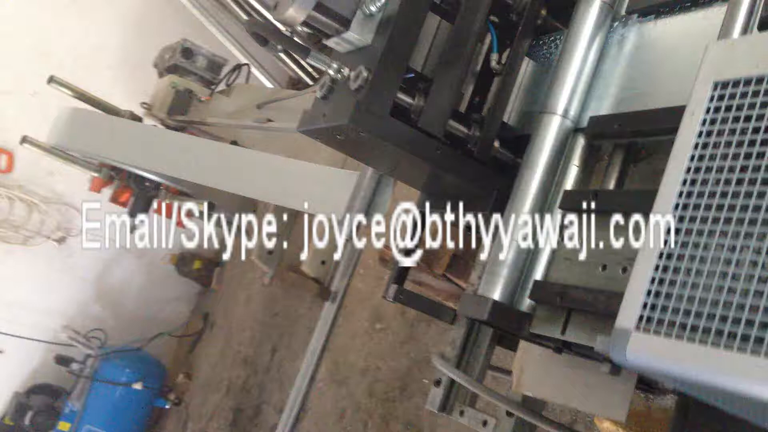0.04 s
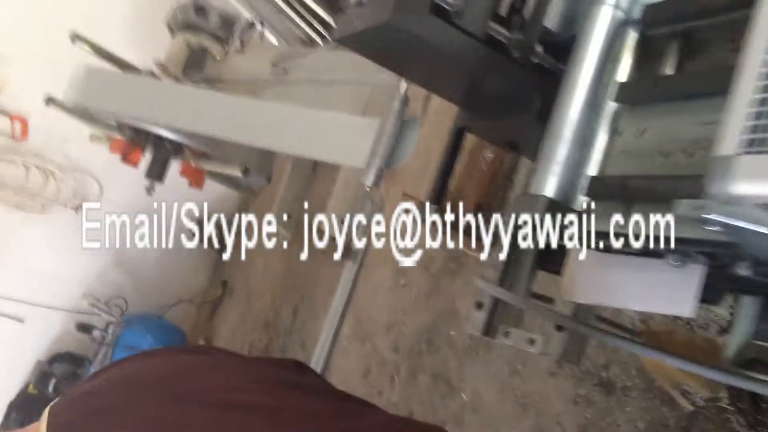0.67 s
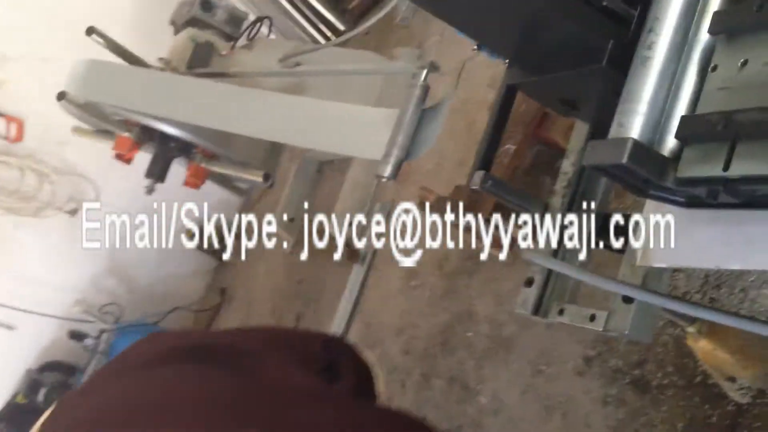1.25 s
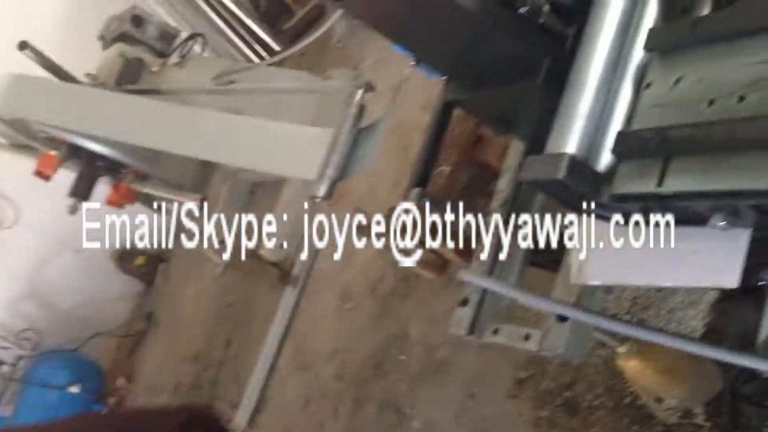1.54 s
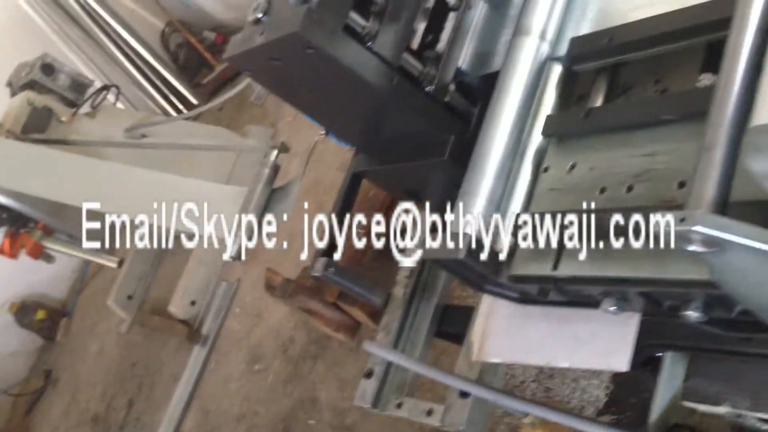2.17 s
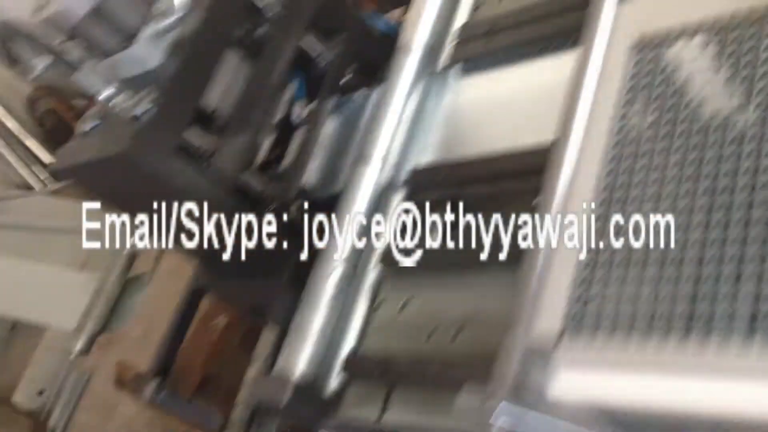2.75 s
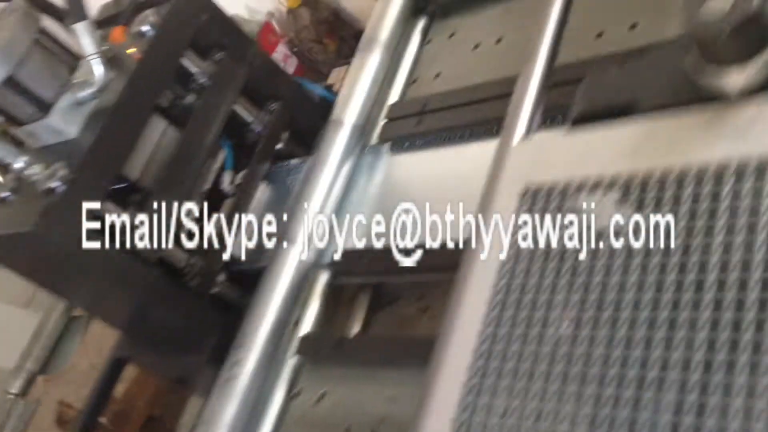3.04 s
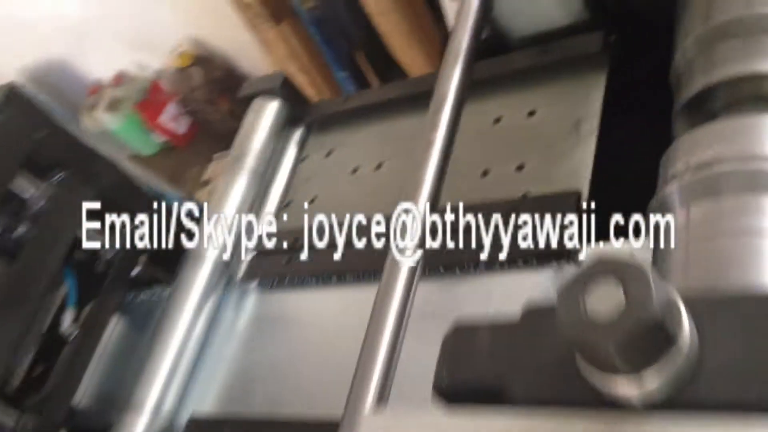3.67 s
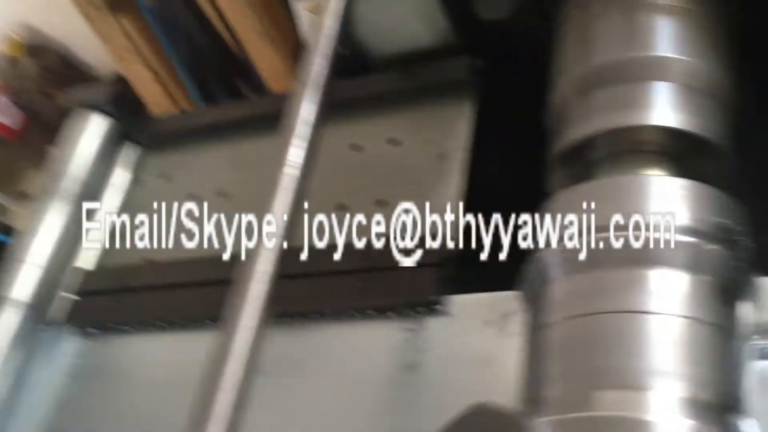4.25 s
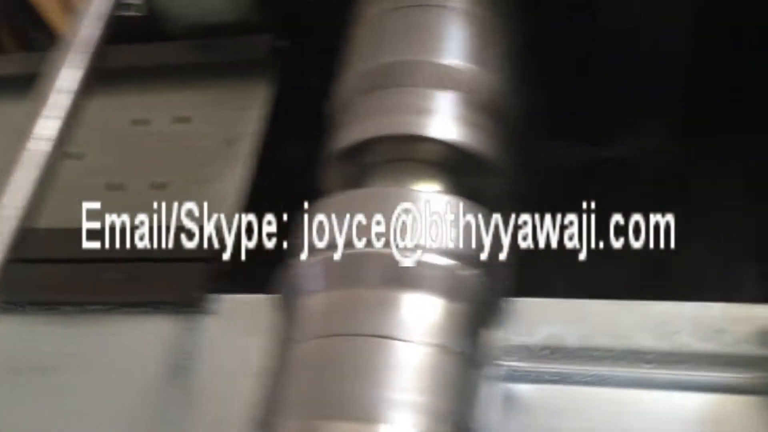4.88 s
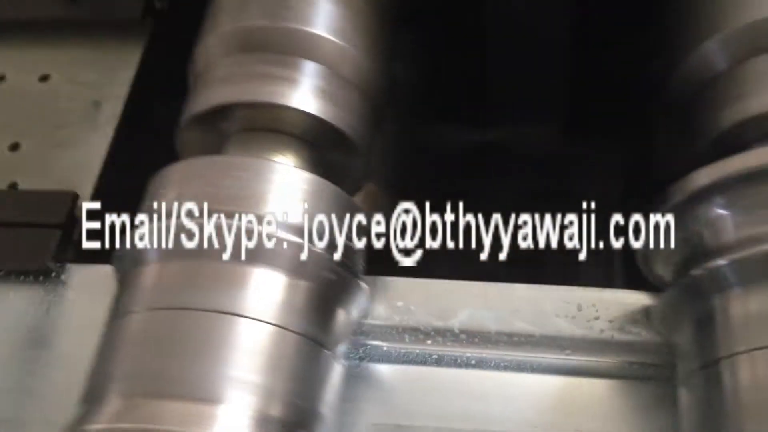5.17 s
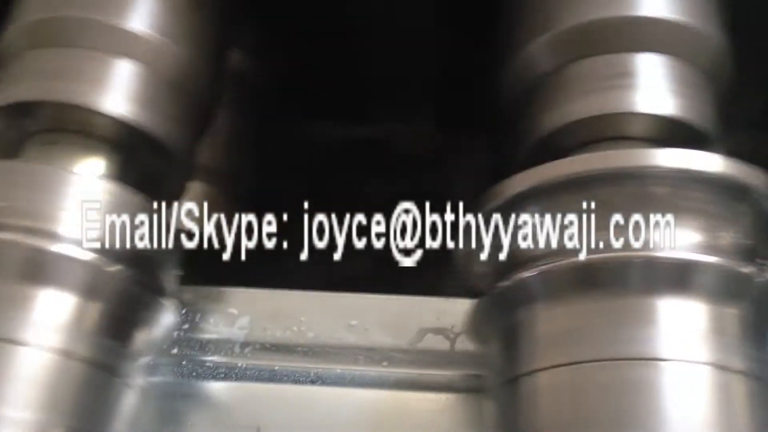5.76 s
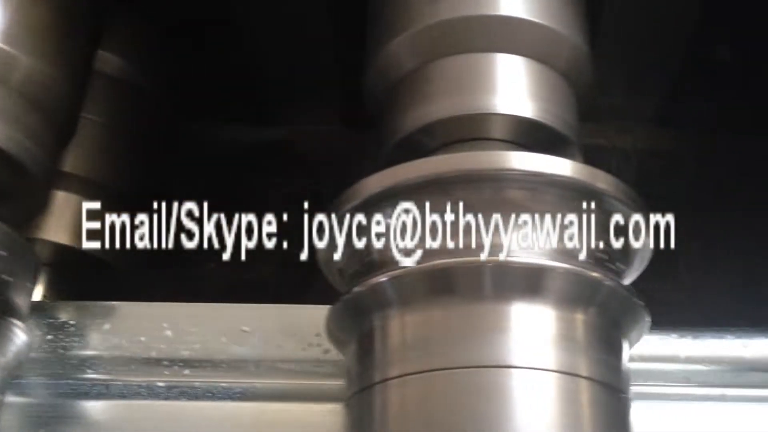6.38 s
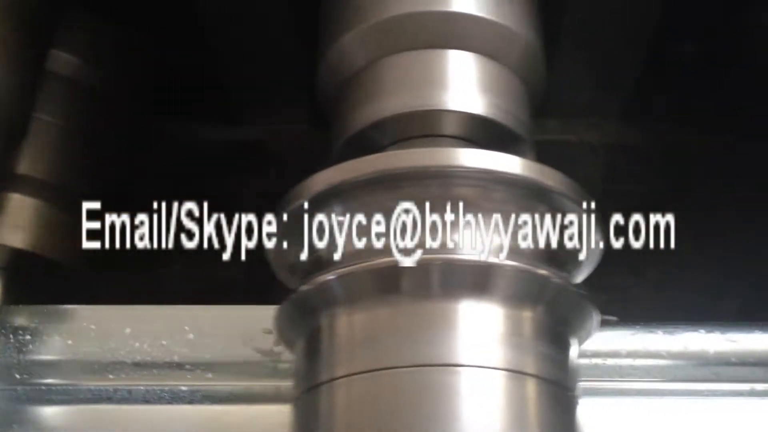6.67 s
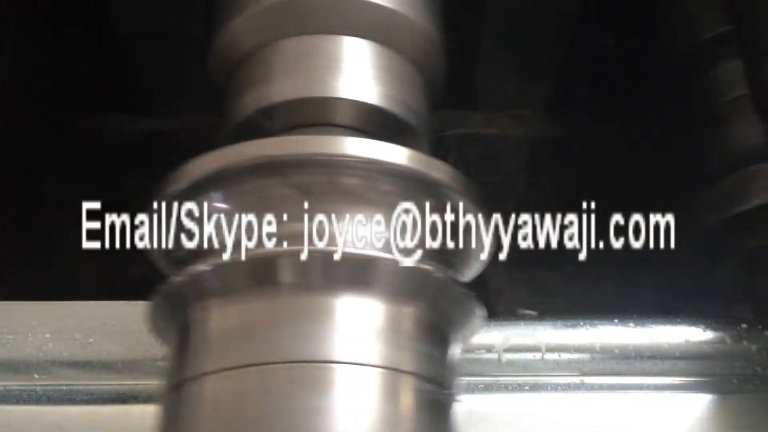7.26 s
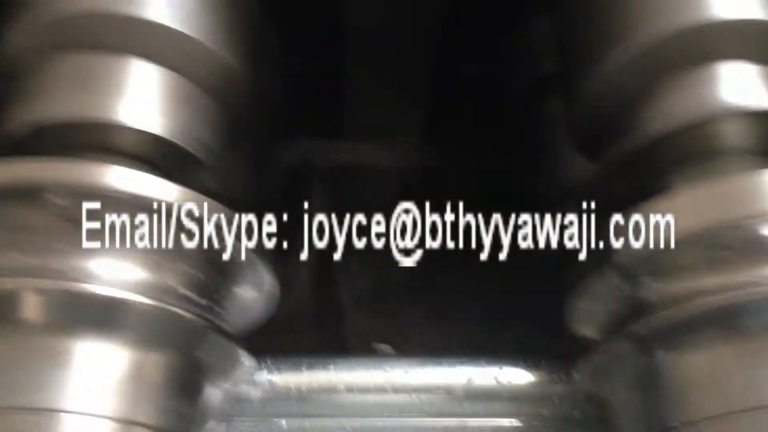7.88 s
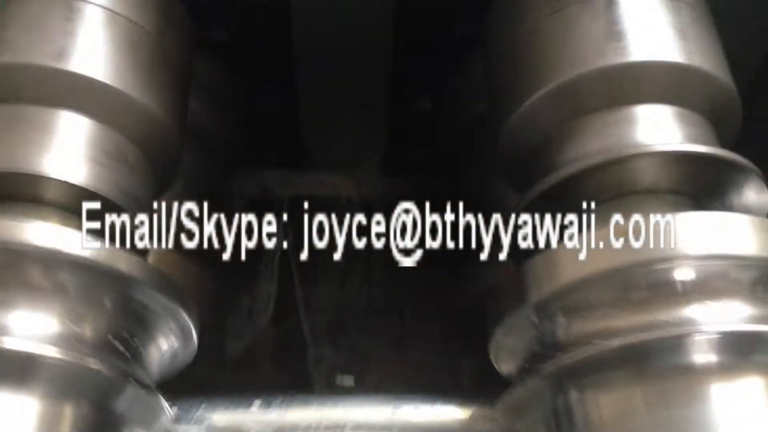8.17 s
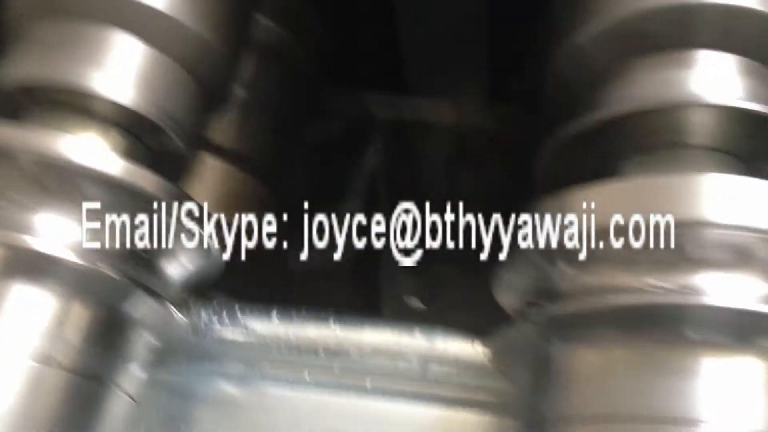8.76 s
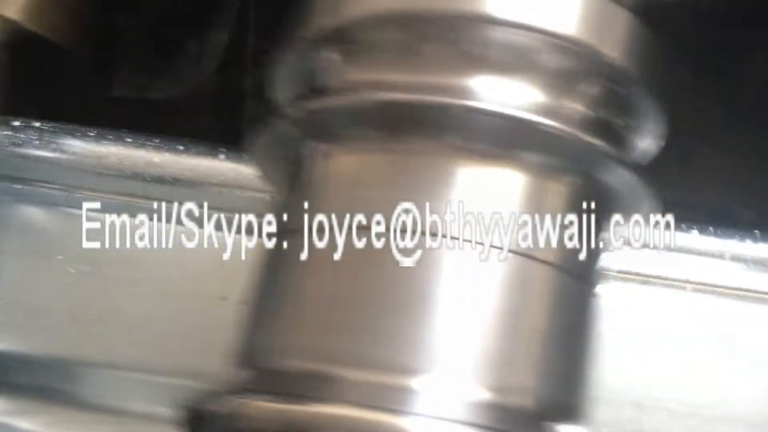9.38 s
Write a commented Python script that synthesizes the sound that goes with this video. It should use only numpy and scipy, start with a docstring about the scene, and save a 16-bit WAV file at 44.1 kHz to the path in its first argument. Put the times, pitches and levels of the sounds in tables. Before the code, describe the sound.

Loud rasping, ringing grinding on steel gives way to a free-spinning grinder's whine and a sheet metal machine's steady hum.

```python
"""Angle grinder beside a roll former

An angle grinder spins up, skims and digs into steel for three seconds, bogs down, lifts off and runs free.
Behind it a machine shapes sheet metal: its pump hums, its drive starts with a thud and drones on,
and the moving sheet ticks and clanks in the rollers. One microphone walks towards the rollers;
its gain control turns the loud grinding down and slowly recovers."""
import sys
import numpy as np
from scipy import signal
from scipy.fft import rfft, irfft, next_fast_len
from scipy.io import wavfile
from scipy.ndimage import uniform_filter1d, minimum_filter1d, map_coordinates

SR = 44100
rng = np.random.default_rng(int(sys.argv[2]) if len(sys.argv) > 2 else 0)


def store_pcm(level_fs):
    """Save levels as 16-bit WAV."""
    pcm = np.round(np.clip(level_fs, -1, 1) * 32767).astype(np.int16)
    wavfile.write(sys.argv[1], SR, np.atleast_2d(pcm).T)


N = 415863
TIME = np.arange(N) / SR
MIC_ON_S = 0.1428


# the disc pressing steadily on the steel (time [s], rasp level [dB], fizz level [dB])
STEADY_CONTACT = [(1.17, -16.5, -14.5), (1.55, -11, -16.5), (1.9, -13, -17), (2.3, -9.5, -11.5),
                  (3.6, -9, -12.5), (3.82, -8.5, -13.5), (4.06, -8, -15.5)]
# the disc skimming the edge in a bright spray (start [s], end [s], rasp level [dB], fizz level [dB])
EDGE_SKIMS = [(1.14, 1.195, -26, -21), (1.245, 1.37, -18, -10.5), (1.375, 1.48, -13, -9.5),
              (1.605, 1.73, -22, -10), (1.985, 2.03, -16, -11), (2.91, 2.99, -11, -19),
              (3.48, 3.64, -12, -14.5)]
# the tone colours of the harsh rasp and the high fizz (frequency [Hz], relative level [dB])
RASP_COLOUR = [(1530, -24), (2600, -4.5), (2820, -4), (3720, 1), (4220, -3.5), (4930, 1), (5600, -7),
               (6150, -4), (8000, -14.5), (10400, -15.5), (17600, -120)]
FIZZ_COLOUR = [(4410, -5.5), (7500, -4.5), (8800, -9), (10900, -6.5), (12800, -9), (15200, -13)]

def grinding(mesh_hz, touch_s=1.153, lift_s=4.101, turns_per_tooth=0.021):
    """The disc's grit tears at the steel, hardest once a turn; skims make it brighter."""
    rasp_db, fizz_db = curves(STEADY_CONTACT)
    steady_rasp = amp(rasp_db) * fading(lift_s, t60=0.67)
    steady_fizz = amp(fizz_db) * fading(lift_s, t60=0.45)
    skim_rasp, skim_fizz = strokes(EDGE_SKIMS, attack_s=0.029, t60=0.42)
    turn = np.sin(2 * np.pi * np.cumsum(mesh_hz * turns_per_tooth) / SR)
    contact = amp(-0.5 * turn + 0.4 * wobble(70) + 1.5 * wobble(2500))  # the fast wobble is the grit
    grit = lambda: unit(contact * noise(patchy_db=2.5))
    steel = ringing_steel(grit, steady_rasp, mesh_hz)
    walls = lambda x: workshop(x, t60=0.45, wet_db=-3.5)
    rasp = np.hypot(steady_rasp, skim_rasp) * walls(coloured(grit(), RASP_COLOUR))  # hypot adds powers
    fizz = np.hypot(steady_fizz, skim_fizz) * walls(coloured(grit(), FIZZ_COLOUR))
    return (steel + rasp + fizz) * ramp(touch_s, 0.009)


# the disc digging in (start [s], end [s], ring level [dB], growl level [dB])
DEEP_DIGS = [(1.26, 1.34, -18, -32), (1.74, 1.83, -14, -43), (1.9, 2.05, -12, -46),
             (2.15, 2.29, -14.5, -35), (2.79, 2.92, -20, -22.5), (3.07, 3.22, -13, -22),
             (3.255, 3.43, -13.5, -24.5), (3.6, 3.72, -7.5, -23.5), (3.86, 4.0, -6.5, -40),
             (4.03, 4.165, -11, -26)]
# the notes the steel rings at (frequency [Hz], width [Hz], relative level [dB])
STEEL_NOTES = [(1236, 54, -10.5), (1410, 3.4, 3.5), (1580, 3.7, 8), (1675, 8, 4), (1776, 23, 2),
               (1855, 19, 4), (1960, 76, 1), (2129, 16.5, 4.5), (2260, 37, -2), (2400, 15, -4.5)]
# the tone colour of the steel's growl (frequency [Hz], relative level [dB])
GROWL_COLOUR = [(480, -28), (650, 0.5), (850, 3), (1050, 3), (1260, 6.5), (1500, -4)]

def ringing_steel(grit, steady_rasp, mesh_hz, ring_db=-6, growl_db=-21):
    """The steel rings and growls under the disc, and louder at each dig."""
    dig_ring, dig_growl = strokes(DEEP_DIGS, attack_s=0.034, t60=0.67)
    best_band = [(1400, 0), (2450, 0)]  # the plate gives off sound best between these frequencies
    notes = coloured(resonant(grit(), STEEL_NOTES), best_band)
    scrape = amp(-7) * coloured(grit(), best_band)  # fills in between the notes
    ring = np.hypot(amp(ring_db) * steady_rasp, dig_ring) * unit(notes + scrape)
    sputter = chatter(mesh_hz)
    growl_gain = np.hypot(amp(growl_db) * steady_rasp, dig_growl)
    growl = growl_gain * workshop(coloured(grit(), GROWL_COLOUR), t60=0.46, wet_db=2.0)
    return ring + sputter + growl


def chatter(mesh_hz, start_s=2.17, end_s=2.84):
    """The straining gears shake the disc against the steel, so it sputters."""
    gain = amp(-12.5) * ramp(start_s, 0.1) * fading(end_s, t60=0.45)
    return gain * tone(mesh_hz, rough=0.95, width_hz=170)


# single notes of the steel that the disc catches (start [s], end [s], frequency [Hz], level [dB])
CAUGHT_NOTES = [(1.25, 1.7, 6140, -25), (1.25, 1.6, 7000, -26), (1.295, 1.578, 2220, -20),
                (1.738, 1.827, 1770, -26), (1.932, 2.07, 1674, -13), (1.955, 2.415, 5990, -17),
                (2.462, 2.535, 2262, -9), (2.933, 3.038, 4950, -18), (3.495, 3.591, 4970, -18),
                (3.622, 3.68, 5900, -18.5), (3.98, 4.1, 4430, -10.5), (4.023, 4.1, 4350, -26)]

def squeals():
    """A caught note builds up, wavers while the disc drives it, and rings out cleanly."""
    out = np.zeros(N)
    for start, end, hz, db in CAUGHT_NOTES:
        wavering = tone(hz, rough=0.55 * fading(end, t60=0.3), width_hz=50)
        out += amp(db) * ramp(start, 0.029) * fading(end, t60=0.73) * wavering
    return out


FREE_HZ = 6245  # how often the gear teeth meet (mesh) at full, free speed
# the grinder's speed while it strains in the cut (time [s], gear mesh rate [Hz])
STRAINING_SPEED = [(2.15, 1880), (2.24, 1896), (2.3, 2220), (2.52, 2280), (2.62, 2124), (2.78, 2293)]

def grinder_speed(opening_hz=3050, bog_s=1.3, freed_s=4.265, lag_s=0.485):
    """The gear mesh rate in Hz: it runs up, bogs down in the cut, and runs up again once freed."""
    run_up = lambda start, hz: FREE_HZ + (hz - FREE_HZ) * np.exp(-np.maximum(TIME - start, 0) / lag_s)
    straining_hz, = curves(STRAINING_SPEED)
    bogged = ramp(bog_s, 0.4)
    return (1 - bogged) * run_up(MIC_ON_S, opening_hz) + bogged * run_up(freed_s, straining_hz)


# the grinder's fan along the walk (time [s], rush level [dB], hiss level at free speed [dB])
FAN_LEVELS = [(1.1, -30.5, -31.5), (4.4, -28, -29.5), (5.8, -28.5, -30), (7.0, -27.5, -32),
              (9.2, -27.5, -33)]
# the tone colours of the fan's rush and hiss (frequency [Hz], relative level [dB])
RUSH_COLOUR = [(530, -44), (900, -3.5), (977, -6), (1590, -8.5), (1720, -1.5), (2130, -3), (2290, 2),
               (2580, -2.5), (2950, -0.5), (3580, -5.5), (6080, -9), (8000, -26.5), (10400, -48),
               (17600, -120)]
HISS_COLOUR = [(3500, -8), (5000, -7), (6200, -12.5), (7900, -13), (9500, -16.5), (11800, -19.5),
               (15400, -25.5)]

def grinder_motor(mesh_hz, housing_hz=3900, housing_width_hz=1050, whistle_ratio=2.595):
    """The fan blows, the gears whine most where the housing rings, and the motor's rotor whistles."""
    rush_db, hiss_db = curves(FAN_LEVELS)
    rush = amp(rush_db) * workshop(coloured(noise(patchy_db=2.0), RUSH_COLOUR), t60=0.16, wet_db=-7.0)
    hiss = amp(hiss_db) * (mesh_hz / FREE_HZ) ** 2.3 * coloured(noise(patchy_db=1.0), HISS_COLOUR)
    housing_gain = np.exp(-((mesh_hz - housing_hz) / housing_width_hz) ** 2)
    breathy_tone = tone(mesh_hz, rough=0.5, width_hz=380)
    whine = amp(rush_db - 13.5) * workshop(housing_gain * breathy_tone, t60=1.0, wet_db=-1)
    fast = np.clip((mesh_hz - 3800) / 2000, 0, 1)  # two thin tones come in at high speed
    gear_tone = amp(-46) * fast ** 2 * tone(mesh_hz, rough=0.55, width_hz=27)
    whistle = amp(-48) * np.sqrt(fast) * tone(mesh_hz * whistle_ratio, rough=0.81, width_hz=320)
    return rush + hiss + whine + gear_tone + whistle


# the pump's tones (frequency [Hz], base level [dB])
PUMP_TONES = [(581.4, -38), (651.4, -36.5), (775.2, -37.5), (872.1, -46), (1157, -45), (1459, -38),
              (2611, -42)]
# how the pump's load shifts them all (time [s], level change [dB])
PUMP_LOADING = [(0.58, -3.5), (0.8, -16), (9.43, -11.5)]

def pump():
    """The hydraulic pump hums on several steady pitches."""
    load_db, = curves(PUMP_LOADING)
    return amp(load_db) * sum(amp(db) * tone(hz, rough=0.083, width_hz=15) for hz, db in PUMP_TONES)


# the drive swelling and fading along the walk (time [s], hum level [dB], gearbox level [dB])
DRIVE_LEVELS = [(0.9, -30.5, -33.5), (1.28, -31, -34.5), (1.42, -36, -37.5), (2.2, -30, -37.5),
                (3.4, -28.5, -32), (4.05, -33, -34), (4.9, -29.5, -29), (5.8, -34, -30), (6.5, -31, -29),
                (7.5, -36, -30.5), (8.25, -35.5, -33.5), (8.75, -35, -30), (9.4, -45, -33)]
# the gearbox's tones (frequency [Hz], relative level [dB])
GEARBOX_TONES = [(434, -8), (598, -14), (651, -7), (748, -1.5), (768, -8)]

def drive(start_s=0.64, hum_hz=298.8):
    """The roll former's motor hums while its gear tones beat against each other."""
    hum_db, gears_db = curves(DRIVE_LEVELS)
    hum = amp(hum_db) * tone(hum_hz, rough=0.0055, width_hz=9.9)
    gears = amp(gears_db) * sum(amp(db) * tone(hz, rough=0.24, width_hz=28) for hz, db in GEARBOX_TONES)
    return (hum + gears) * ramp(start_s, 0.067)


# the tone colours of the low rumble and the rolling noise (frequency [Hz], relative level [dB])
RUMBLE_COLOUR = [(25, -34), (50, -26), (90, -20.5), (120, -8.5), (160, -3.5), (200, 4), (240, -4.5),
                 (290, -4)]
ROLLING_COLOUR = [(150, -52), (250, -7), (400, 1), (520, -1), (610, 0.5), (700, 0.5), (780, 0.5), (860, 0),
                  (1100, -6.5), (1600, -6.5)]

def rollers(approach_db_per_s=0.896):
    """The turning rollers rumble, louder as the microphone comes nearer."""
    near_db = approach_db_per_s * TIME
    rumble = amp(-44 + near_db) * coloured(noise(patchy_db=1.4), RUMBLE_COLOUR)
    flutter = noise(patchy_db=2.5) * amp(1.54 * wobble(60))
    rolling = amp(-36 + near_db) * workshop(coloured(flutter, ROLLING_COLOUR), t60=0.67, wet_db=0.5)
    return rumble + rolling


# blows in the machine's frame (time [s], level [dB], rise time [s], fade time [s])
FRAME_BLOWS = [(0.614, -22, 0.024, 0.62), (0.675, -27.5, 0.0088, 0.45)]
# the frame's dull tone colour (frequency [Hz], relative level [dB])
FRAME_COLOUR = [(40, -29), (110, -20), (180, 9), (240, 2), (330, -2), (500, 1), (800, -11), (1500, -12),
                (3000, -33), (8000, -60)]

def frame_thuds():
    """The frame shudders as the drive starts to pull."""
    gain = sum(amp(db) * ramp(s, rise) * fading(s + rise, t60) for s, db, rise, t60 in FRAME_BLOWS)
    return gain * coloured(rng.standard_normal(N), FRAME_COLOUR)


# the sheet knocking on the rollers (time [s], level [dB], fade time [s])
SHEET_KNOCKS = [(7.98, -27, 0.6), (8.93, -30, 0.3), (8.99, -20.5, 0.28)]
# the notes the sheet rings at (frequency [Hz], width [Hz], relative level [dB])
SHEET_NOTES = [(665, 70, 4), (830, 70, -6), (1300, 300, -17), (2260, 90, 0), (2690, 50, 5),
               (4000, 1200, -16)]

def sheet_clanks():
    """The sheet buzzes against a roller for a moment, then rings out."""
    gain = sum(amp(db) * ramp(s, 0.01) * fading(s + 0.03, t60) for s, db, t60 in SHEET_KNOCKS)
    return gain * resonant(rng.standard_normal(N), SHEET_NOTES)


# short scrapes of the sheet's edge (time [s], level [dB], fade time [s])
EDGE_SCRAPES = [(5.555, -26, 0.16), (5.592, -33, 0.12), (7.27, -28, 0.14), (8.925, -38, 0.18),
                (9.0, -45, 0.2)]
# their bright tone colour (frequency [Hz], relative level [dB])
EDGE_COLOUR = [(1000, -25), (2200, 4), (5000, 4), (9000, -2), (13000, -1), (15400, 0)]

def edge_ticks():
    """The sheet's edge scrapes in the rollers so briefly that it ticks."""
    gain = sum(amp(db) * ramp(s, 0.0028) * fading(s + 0.0079, t60) for s, db, t60 in EDGE_SCRAPES)
    return gain * coloured(rng.standard_normal(N), EDGE_COLOUR)


def workshop(x, t60, wet_db):
    """Hard walls add a dense tail of echoes, wet_db louder than the direct sound."""
    t = TIME[:SR // 2]
    tail = rng.standard_normal(len(t)) * np.exp(-np.log(1000) * t / t60)
    return unit(x + amp(wet_db) * signal.fftconvolve(x, tail / np.linalg.norm(tail))[:N])


def amp(db):
    """Turns decibels into a gain to multiply by."""
    return 10 ** (np.asarray(db) / 20)


def unit(x):
    """Scales x to an average strength (rms) of 1."""
    return x / np.sqrt(np.mean(x ** 2) + 1e-20)


def curves(rows):
    """One value per sample for each column after the time."""
    times, *columns = np.transpose(rows)
    return [np.interp(TIME, times, column) for column in columns]


def wobble(rate):
    """A smooth random curve through rate points a second."""
    return map_coordinates(rng.standard_normal(N // 16), [TIME * rate], mode="mirror")


def ramp(start_s, length_s):
    """Rises from 0 to 1."""
    return np.clip((TIME - start_s) / length_s, 0, 1)


def fading(start_s, t60):
    """Holds 1 until start_s, then falls 60 dB every t60 seconds (the fade time)."""
    return np.exp(-np.log(1000) * np.maximum(TIME - start_s, 0) / t60)


def strokes(rows, attack_s, t60):
    """Each stroke rises, holds and dies away; one gain curve for each level column."""
    gains = (np.outer(amp(db), ramp(start, attack_s) * fading(end, t60)) for start, end, *db in rows)
    return np.sqrt(sum(gain ** 2 for gain in gains))


def filtered(x, response):
    """Multiplies each frequency in x by response(frequency)."""
    size = next_fast_len(N + SR // 2)
    return irfft(rfft(x, size) * response(np.fft.rfftfreq(size, 1 / SR)), size)[..., :N]


def coloured(x, points):
    """Gives x a tone colour that falls 39 dB an octave beyond the end points; rms 1."""
    freqs, db = np.transpose(points)
    octaves = lambda hz: np.log2(hz + 1)
    beyond = lambda hz: np.abs(octaves(hz) - octaves(np.clip(hz, freqs[0], freqs[-1])))
    response = lambda hz: amp(np.interp(octaves(hz), octaves(freqs), db) - 39 * beyond(hz))
    return unit(filtered(x, response))


def resonant(x, notes):
    """Makes x ring at the given notes; rms 1."""
    peak = lambda f, hz, width: 1j * f * width / (hz * hz - f * f + 1j * f * width)
    return unit(filtered(x, lambda f: sum(amp(db) * peak(f, hz, width) for hz, width, db in notes)))


def noise(patchy_db):
    """White noise with louder and softer patches in time and frequency."""
    spectra = signal.stft(rng.standard_normal(N), nperseg=1024)[2]
    patches = uniform_filter1d(rng.standard_normal(spectra.shape), size=6, axis=0)
    patches = uniform_filter1d(patches, size=12, axis=1)
    return unit(signal.istft(spectra * amp(patchy_db * unit(patches)), nperseg=1024)[1][:N])


def tone(hz, rough, width_hz):
    """A tone whose rough share (0 to 1) is smeared into a narrow band of noise."""
    swing = np.sqrt(1 - rough) + np.sqrt(rough / 2) * (wobble(width_hz) + 1j * wobble(width_hz))
    phase = 2 * np.pi * np.cumsum(np.broadcast_to(hz, N)) / SR
    return np.sqrt(2) * np.real(swing * np.exp(1j * phase))


def scene():
    """Everything reaches one microphone, the same in both channels."""
    mesh_hz = grinder_speed()
    grinder = grinding(mesh_hz) + squeals() + grinder_motor(mesh_hz)
    roll_former = pump() + drive() + rollers() + frame_thuds() + sheet_clanks() + edge_ticks()
    mono = grinder + roll_former
    return np.array([mono, mono])


def gain_control(x, threshold_db=-19.5, cut_share=0.43, attack_s=0.15, recovery_db_per_s=5):
    """Takes off a share of the level above the threshold, then lets the gain creep back."""
    level_db = 10 * np.log10(np.abs(uniform_filter1d(x[0] ** 2, size=2205)) + 1e-12)
    cut_db = cut_share * np.maximum(level_db - threshold_db, 0)
    creep_db = recovery_db_per_s * TIME
    held_db = np.maximum.accumulate(cut_db + creep_db) - creep_db
    smoothing = np.exp(-1 / (attack_s * SR))
    return x * amp(-signal.lfilter([1 - smoothing], [1, -smoothing], held_db))


def record(dry, top_hz=15400):
    """The microphone switches on; loud sound is turned down, peaks are limited, the top treble is cut."""
    x = gain_control(dry * ramp(MIC_ON_S, 0.0016))
    needed_gain = 1 / np.maximum(np.abs(x), 1)
    limiter_gain = uniform_filter1d(minimum_filter1d(needed_gain, size=65), size=65)
    return filtered(x * limiter_gain, lambda hz: hz < top_hz)


dry = scene()
out = record(dry)
store_pcm(out)
```